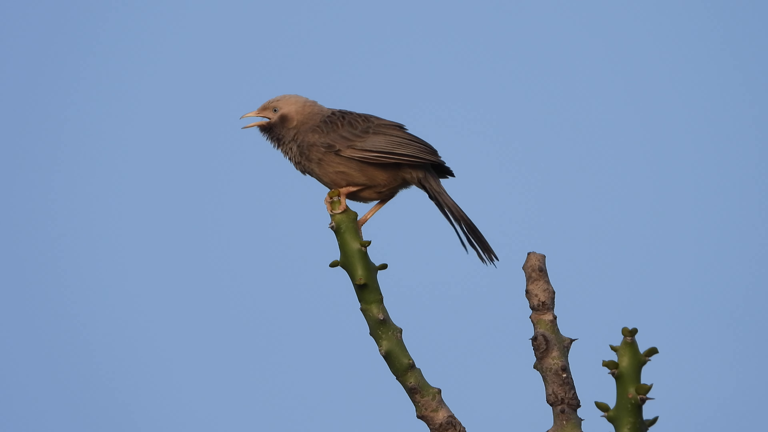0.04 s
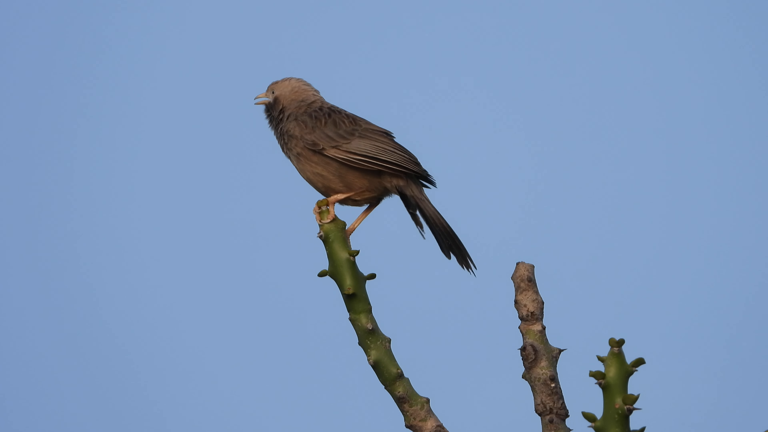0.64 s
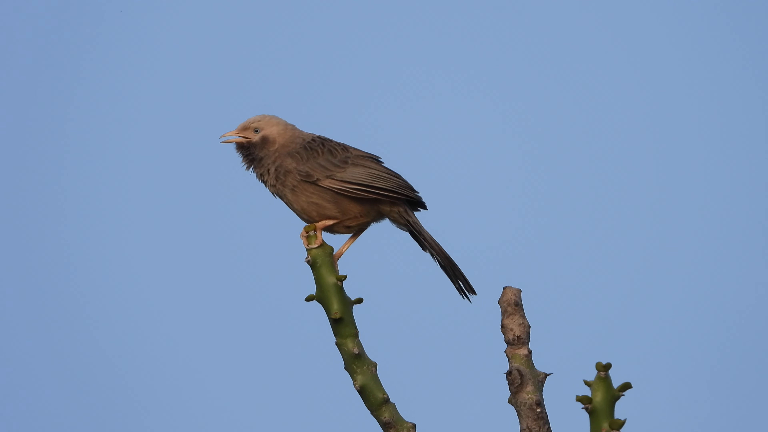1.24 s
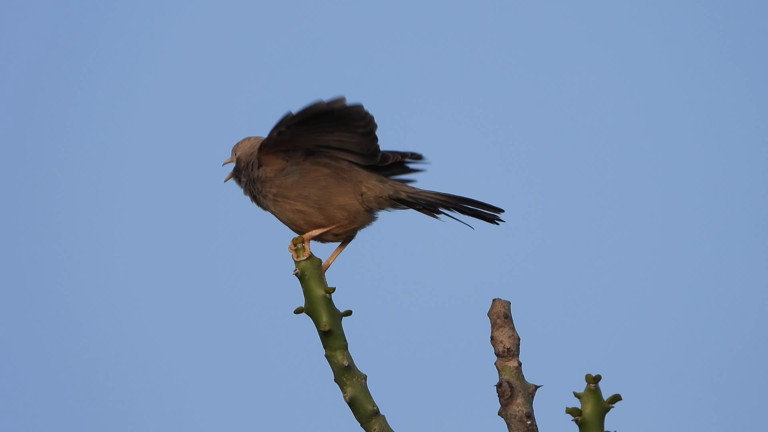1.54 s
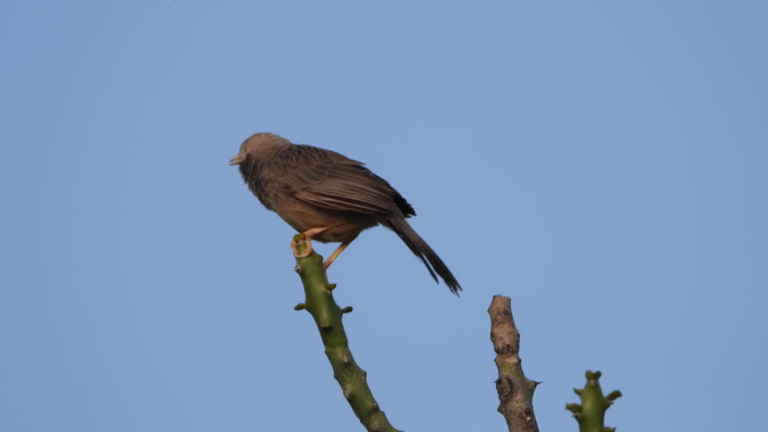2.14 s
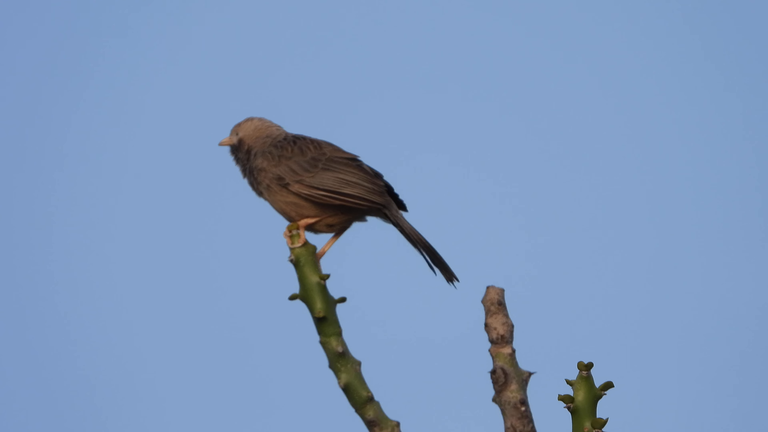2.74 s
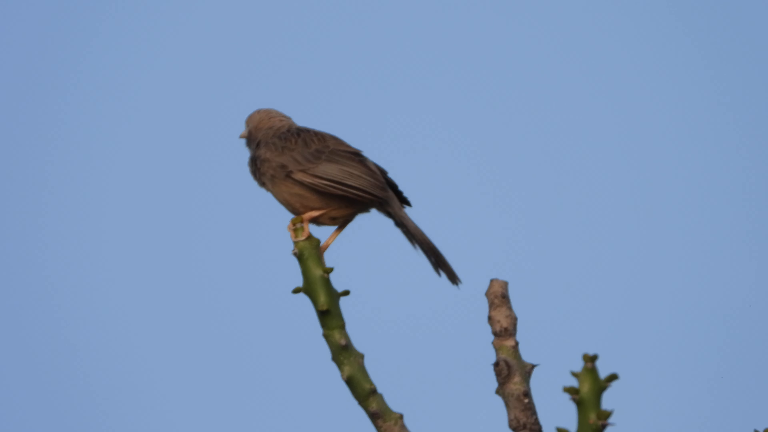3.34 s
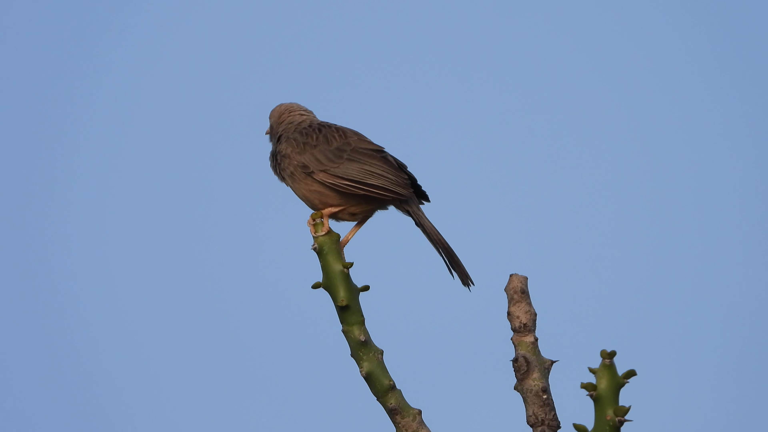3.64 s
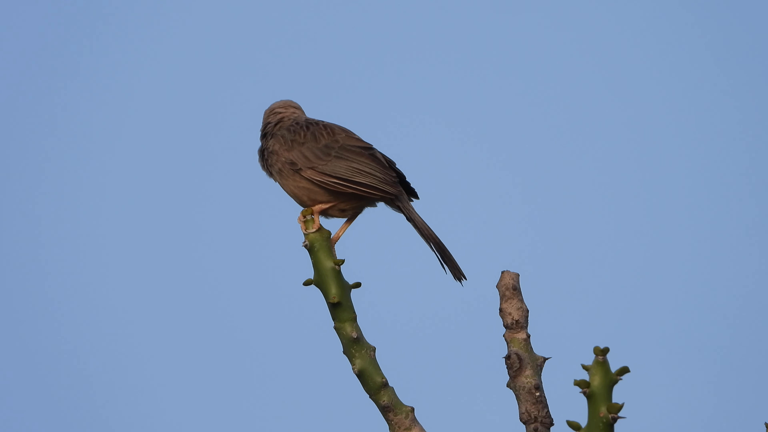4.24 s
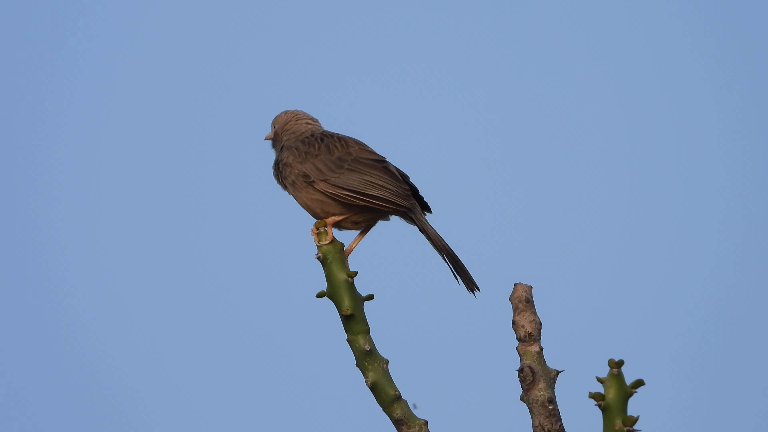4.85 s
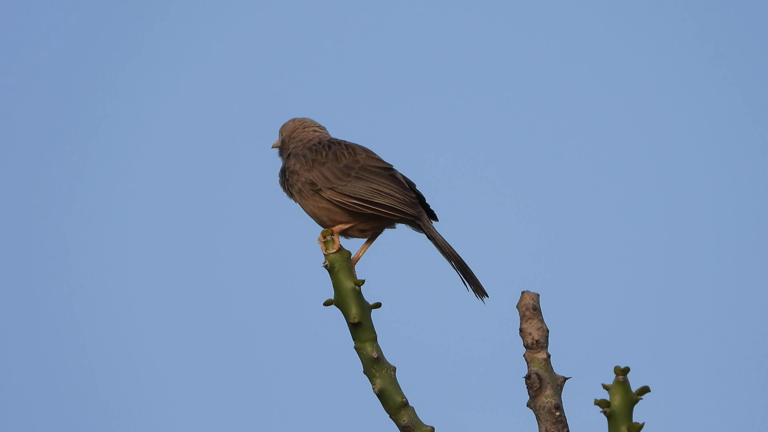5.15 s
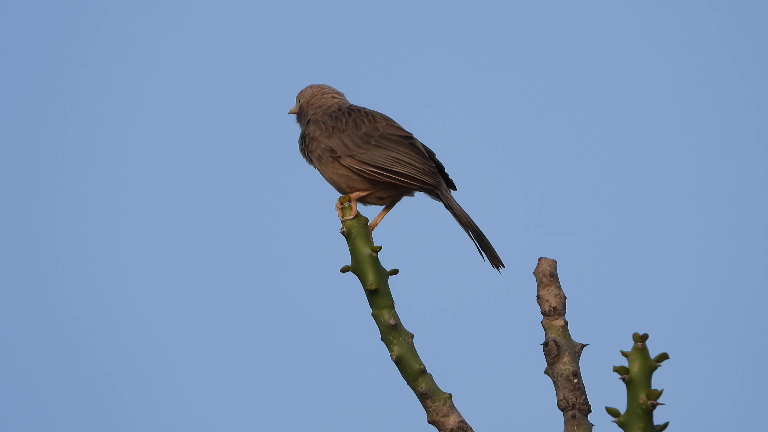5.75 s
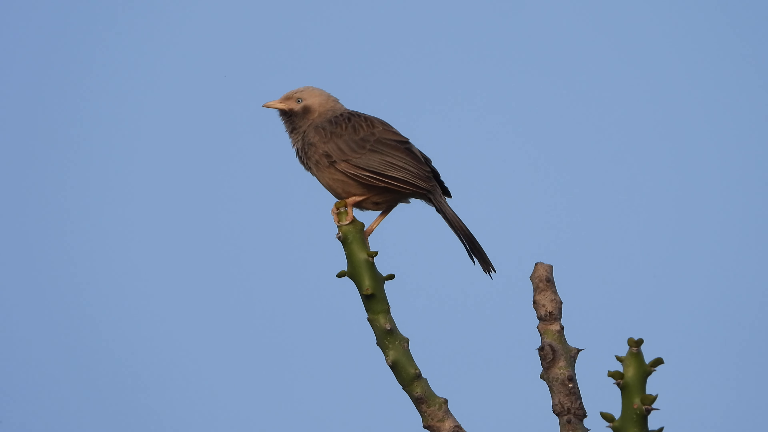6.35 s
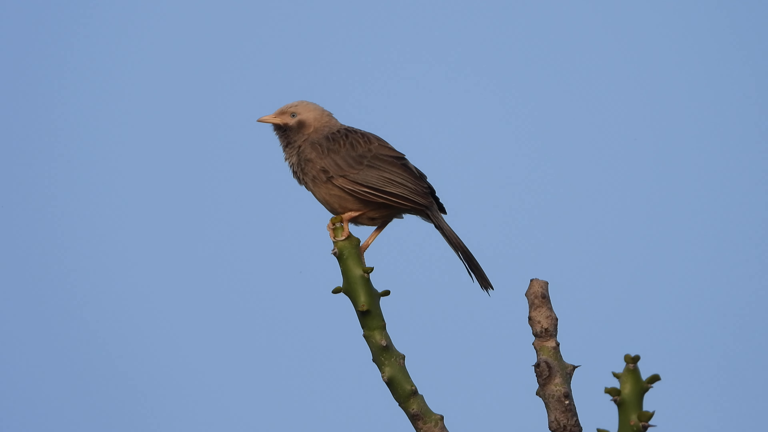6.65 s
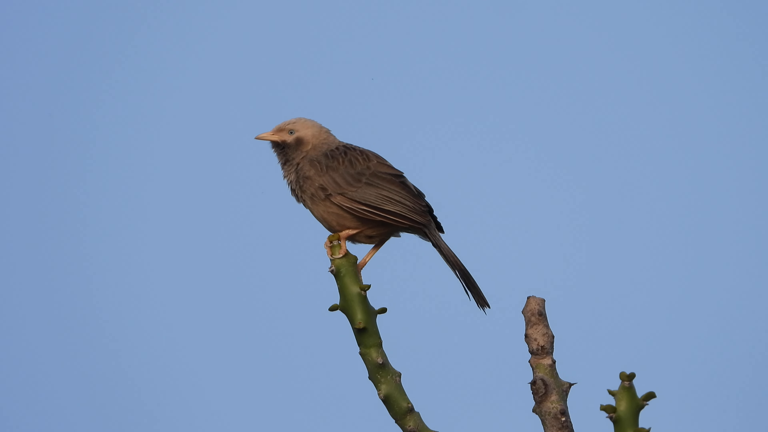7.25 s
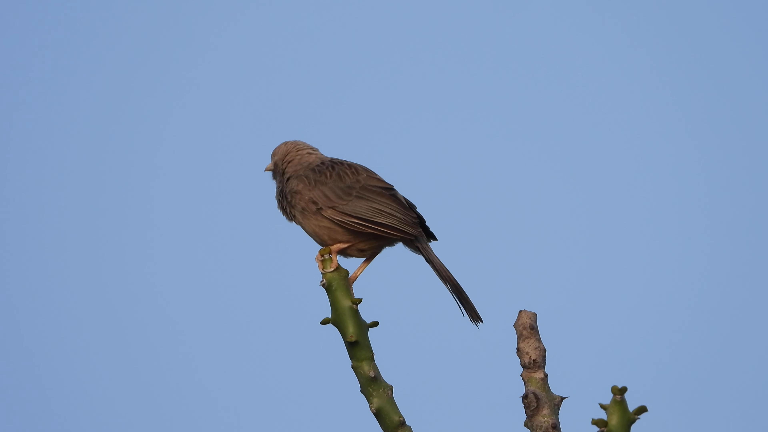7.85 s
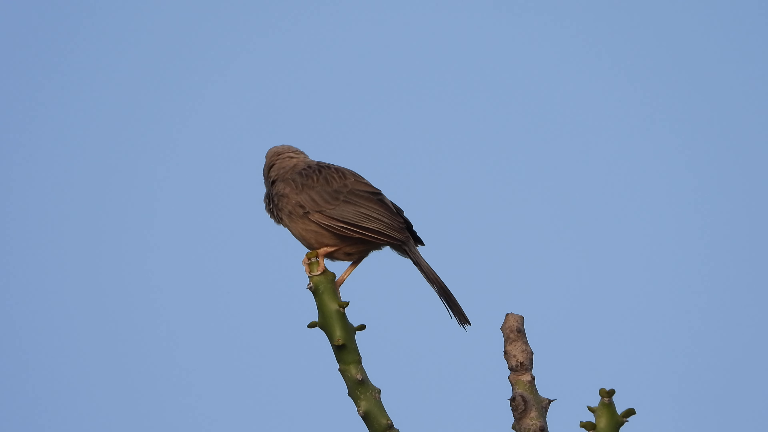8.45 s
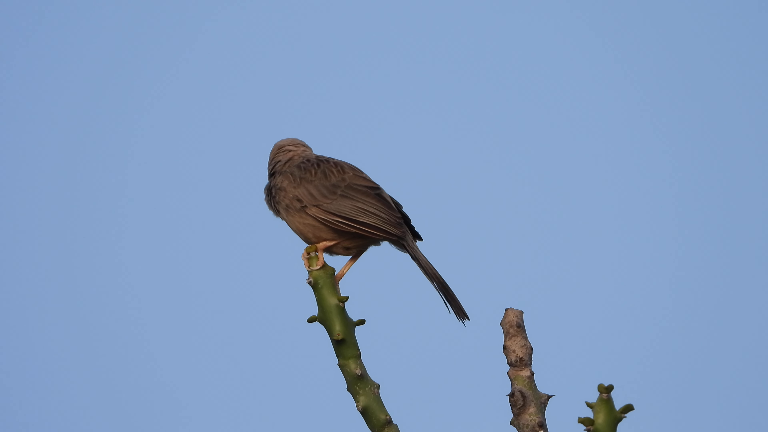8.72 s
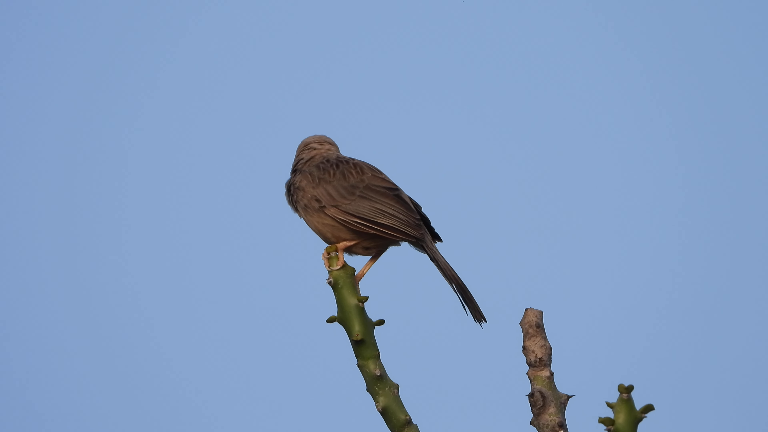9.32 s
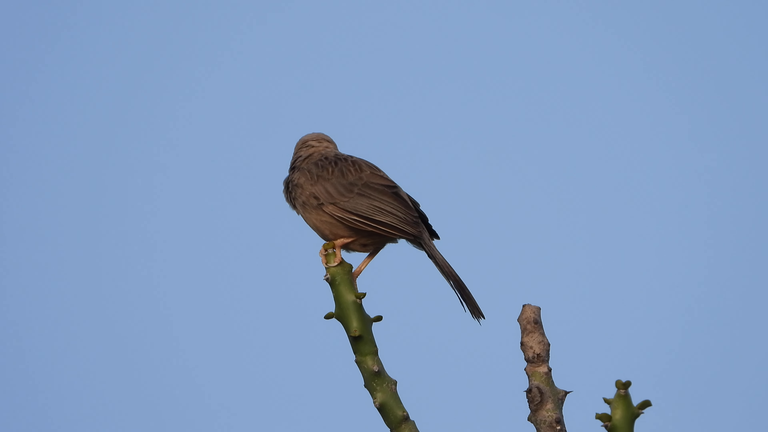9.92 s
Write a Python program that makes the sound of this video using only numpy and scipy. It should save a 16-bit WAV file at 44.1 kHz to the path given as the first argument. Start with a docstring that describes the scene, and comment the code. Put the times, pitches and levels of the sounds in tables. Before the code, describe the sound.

In quiet open scrub, a still camera right beside the microphone rattles off ten quick shutter clicks while a bird gives four rising whistles and another pips. The whistling bird then begins a long, even run of sharp falling calls. Farther birds squawk hoarsely around it, and one ends with a few soft rasps. Small birds chip throughout over a faint throbbing insect and distant traffic that slowly swells.

```python
"""In open scrub, a still camera beside the microphone fires ten quick frames while a perched babbler
whistles and a neighbour pips. From about 2 s the babbler gives a long run of sharp falling calls.
From about 4 s its flock squawks around it, and just after 8 s one bird closes with a few rasps.
All along, small birds chip and an insect throbs; far traffic slowly swells towards the end."""
import sys
import numpy as np
from scipy import signal
from scipy.fft import rfft, irfft, next_fast_len
from scipy.io import wavfile
from scipy.ndimage import uniform_filter1d

SR = 44100
rng = np.random.default_rng(int(sys.argv[2]) if len(sys.argv) > 2 else 0)


def output_pcm(signal):
    """Save a mono or channel-first signal as 16-bit PCM at the path in sys.argv[1].

    Samples are clipped to [-1, 1] before scaling.
    """
    pcm = np.clip(np.atleast_2d(signal).T, -1, 1) * 32767
    wavfile.write(sys.argv[1], SR, np.round(pcm).astype(np.int16))


N = 440118
TIME = np.arange(N) / SR
ALONG = np.linspace(0, 1, 60)   # progress through a note, 0 to 1
# the babbler's calls: (start [s], length [s], top pitch [Hz], bottom pitch [Hz], level [dB],
# low half compared with high half [dB])
FALLING_CALLS = [(1.787, 0.043, 5380, 2616, -29, -5.5), (2.05, 0.054, 5820, 2550, -22.5, -11.5),
                 (2.313, 0.056, 5520, 2664, -22, -7), (2.561, 0.053, 5580, 2610, -22.5, -5.5),
                 (2.815, 0.055, 5570, 2604, -20.5, -8), (3.066, 0.051, 5760, 2645, -24.5, -5),
                 (3.336, 0.055, 5670, 2600, -23, -7.5), (3.605, 0.058, 5480, 2604, -24.5, -5.5),
                 (3.862, 0.042, 5510, 2730, -21, -8.5), (4.11, 0.055, 5630, 2670, -23, -6.5),
                 (4.368, 0.051, 5630, 2620, -24, -6), (4.622, 0.054, 5530, 2700, -21.5, -7.5),
                 (4.877, 0.053, 5670, 2514, -20.5, -11), (5.161, 0.044, 5580, 2640, -23.5, -7),
                 (5.42, 0.047, 5740, 2596, -23.5, -10.5), (5.67, 0.046, 5700, 2640, -23, -6),
                 (6.038, 0.052, 5610, 2670, -23, -9.5), (6.406, 0.054, 5550, 2690, -24.5, -9.5),
                 (6.763, 0.05, 5620, 2560, -23.5, -9)]


def babbler(tail_s=.008, break_at=.39, break_width=.074):
    """Each call swells as it slides down, thins where the voice breaks and levels out an octave lower."""
    # shape of the fall: (progress [0 to 1], height above the bottom pitch [0 to 1])
    fall_shape = [(0, 1), (.18, .86), (.34, .62), (.47, .3), (.61, .08), (.78, 0), (1, .03)]
    height = np.interp(ALONG, *np.transpose(fall_shape))
    past_break = (ALONG - break_at) / break_width
    low_half = np.clip(1 + past_break, 0, 1)
    thinning_db = -3 * np.exp(-past_break ** 2)
    shape_db = 2 + swell(attack=.36, release=.15, depth_db=-20) + thinning_db
    facings = np.zeros((4, N))   # the bird turns its head, and each way it faces has its own echoes
    for k, (start, length, top_hz, bottom_hz, db, low_db) in enumerate(FALLING_CALLS):
        pitch = bottom_hz + (top_hz - bottom_hz) * height
        level = db + shape_db + low_db * low_half
        call = sing(length + tail_s, pitch, level, waver=.018, flutter_db=5, flutter_rate=520)
        add(facings[k % len(facings)], start, call)
    return sum(scrub(place(track, pan_db=-.8), near_db=-4.5, far_db=-13.5, near_s=.17, scatter_hz=3200)
               for track in facings)


def lilts(length=.069, after_s=.078, top_hz=2308, fade_db_per_s=-.68):
    """A soft, husky rising note follows every falling call, fainter each time."""
    out = np.zeros(N)
    pitch = top_hz * (1 - .24 * (1 - ALONG) ** 1.5)
    level = -37 + swell(attack=1, release=.4, depth_db=-18)
    for start, *_ in FALLING_CALLS:
        add(out, start + after_s, sing(length, pitch, level + fade_db_per_s * start, waver=.037))
    return scrub(place(out, pan_db=-.5), near_db=2, far_db=-7, near_s=.07)


def whistles(crest_at=.68):
    """The babbler's clean opening whistles climb to a crest and just turn over."""
    # (start [s], length [s], first pitch [Hz], top pitch [Hz], level [dB], left over right [dB])
    notes = [(0.202, 0.11, 3530, 4010, -30.5, 5), (0.626, 0.1, 3300, 4310, -25.5, 1.5),
             (1.13, 0.094, 3840, 4400, -19, 3.5), (1.682, 0.096, 3960, 4640, -18.5, 5.5)]
    out = np.zeros((2, N))
    below_crest = (1 - ALONG / crest_at) ** 2
    shape_db = swell(attack=.5, release=.36, depth_db=-19)
    for start, length, first_hz, top_hz, db, pan_db in notes:
        pitch = top_hz + (first_hz - top_hz) * below_crest
        note = sing(length, pitch, db + shape_db, waver=.0058, flutter_db=3, overtone_db=-36.5, third_db=-5)
        add(out, start, note * balance(pan_db))
    return scrub(out, near_db=-11, far_db=-24, near_s=.14)


def camera(frame_db=-28, burst_s=.214, gap_s=.1405):
    """In each frame the mirror, shutter curtains and winding set off rattles that ring in the body."""
    # knocks within one frame: (time after the release [s], level [dB], fade time [s])
    knocks = [(.001, -4.5, 0.045), (.012, -4, 0.04), (.024, -18.5, 0.035), (0.044, -1, 0.043),
              (.048, -3.5, 0.037), (.062, -13, 0.033), (.082, -6, 0.023), (0.092, -4, 0.02)]
    # tone of the rattle: (frequency [Hz], level [dB])
    rattle_tone = [(71, -42), (120, -71), (346, -21.5), (459, -22), (899, -15.5), (1590, -7), (2030, -8.5),
                   (2160, -13.5), (2440, -9), (2750, -6.5), (2980, -3.5), (3810, -3.5), (4220, 0.5),
                   (8770, -7), (15500, -31)]
    # how alike the two sides are: (frequency [Hz], likeness [-1 to 1])
    likeness = [(200, 0.8), (800, 0.6), (1500, 0.24), (4000, -0.3), (6000, 0), (9000, -0.41), (15000, 0.5)]
    # ringing of the body: (pitch [Hz], width [Hz], level [dB])
    rings = [(331, 18, 15), (548, 35, 8.5), (713, 45, 6), (1117, 17, 11), (1622, 52, 6), (1807, 28, 10.5),
             (2168, 39, 19)]
    power = np.zeros(N)
    t = np.arange(SR // 5) / SR
    for start in [-.042, *(burst_s + gap_s * np.arange(9))]:   # one frame, then nine evenly spaced
        for after_s, db, fade_s in knocks:
            strength = from_db(frame_db + db + rng.normal(0, 1))
            add(power, start + after_s, strength ** 2 * np.exp(-2 * t / fade_s))
    loudness = np.sqrt(np.abs(uniform_filter1d(power, size=40)))
    grit_times = TIME[::30]
    grit = from_db(2.7 * np.interp(TIME, grit_times, rng.standard_normal(len(grit_times))))
    rattle = stereo_noise(rattle_tone, likeness) * loudness * grit
    body = sum(from_db(db) * resonance(rattle.mean(axis=0), hz, width) for hz, width, db in rings)
    sound = from_db(1) * rattle * balance(1) + body * [[1], [.5]]
    return signal.sosfilt(signal.butter(4, 170, "high", fs=SR, output="sos"), sound)


def pips(length=.04):
    """A neighbour on the left gives runs of short, slightly arched, unsteady pips."""
    # (start [s], pitch [Hz], level [dB])
    notes = [(-0.005, 3105, -33), (0.04, 3020, -40), (0.095, 2945, -35), (0.147, 3030, -39),
             (0.332, 2960, -37.5), (0.385, 2895, -35), (0.441, 2950, -31), (0.503, 2930, -34.5),
             (0.562, 3090, -32.5), (0.879, 3060, -36), (0.932, 3010, -41), (1, 2870, -40),
             (1.065, 3020, -37.5), (1.275, 3170, -34), (1.322, 2950, -35.5), (1.375, 2920, -35),
             (1.435, 2822, -33), (1.496, 2896, -33.5), (1.559, 2940, -36.5), (1.621, 3000, -33),
             (1.936, 3100, -37.5), (1.993, 2950, -36.5), (2.121, 2880, -36.5), (2.224, 2790, -41.5),
             (2.285, 2820, -42.5), (2.459, 3265, -39.5), (2.518, 3000, -38), (2.675, 2950, -38.5),
             (2.753, 2890, -39), (3.271, 2910, -40)]
    out = np.zeros(N)
    shape_db = 3.5 + swell(attack=.4, release=.72, depth_db=-16)
    arch = 1 + .02 * (.25 - (2 * ALONG - 1) ** 2)
    for start, hz, db in notes:
        add(out, start, sing(length, hz * arch, db + shape_db, waver=.018))
    return scrub(place(out, pan_db=4), near_db=-11, far_db=-18)


def chips():
    """Small birds give thin chips from the right."""
    # (start [s], length [s], top pitch [Hz], level [dB])
    notes = [(.574, 0.032, 5920, -29), (.796, .025, 6070, -23), (.815, 0.026, 6110, -24.5),
             (.84, 0.019, 5640, -26), (1.745, 0.029, 6840, -37.5), (2.019, 0.024, 5900, -40.5),
             (2.09, 0.024, 6180, -27.5), (2.114, 0.029, 5980, -27), (2.709, 0.026, 5550, -36),
             (3.311, 0.016, 6100, -31.5), (3.569, 0.023, 6070, -23.5), (3.827, 0.023, 6280, -30.5),
             (4.028, 0.025, 6550, -34), (5.301, 0.021, 6560, -29.5), (5.416, 0.026, 5980, -22),
             (5.463, 0.031, 5770, -25.5), (5.768, 0.02, 6200, -38), (6.56, 0.024, 6800, -36),
             (6.615, 0.027, 5500, -40), (7.759, .021, 6280, -38), (7.892, 0.02, 7230, -34),
             (7.935, 0.029, 6180, -30), (8.148, .029, 6500, -32), (8.2, .029, 5900, -31.5),
             (8.241, .031, 5540, -34.5), (8.456, 0.019, 6800, -38), (9.325, .021, 5820, -34),
             (9.362, 0.028, 6530, -29), (9.684, .02, 6000, -40), (9.807, 0.03, 5870, -33),
             (9.849, 0.025, 5550, -30.5), (9.877, 0.019, 6800, -40), (9.949, 0.028, 6900, -33.5)]
    return scrub(place(chip_series(notes), pan_db=-1.5, lag_s=-3.9e-5), near_db=-6, far_db=-13)


def slurs():
    """Clean notes from other perches, each bending smoothly through three pitches."""
    # (start [s], length [s], first pitch [Hz], middle pitch [Hz], last pitch [Hz], level [dB],
    # left over right [dB])
    notes = [(0.779, 0.073, 4500, 4350, 4250, -29.5, -2), (1.84, 0.087, 3340, 3294, 3090, -36, 4),
             (3.405, 0.16, 4710, 3720, 3010, -36.5, -3), (3.425, 0.04, 2425, 2515, 2460, -32.5, 1),
             (3.767, 0.16, 2895, 2340, 2660, -37.5, -3), (6.166, 0.041, 2903, 3060, 2954, -28.5, 3.5),
             (7.017, 0.07, 2926, 3168, 3080, -31.5, 7.5), (7.272, 0.055, 2710, 3140, 3770, -44, -5),
             (7.304, 0.35, 3540, 3500, 3310, -40, -5), (9.835, 0.027, 3380, 2980, 3120, -46, 0)]
    out = np.zeros((2, N))
    shape_db = swell(attack=.048, release=.51, depth_db=1.5)
    for start, length, *pitches, db, pan_db in notes:
        pitch = np.polyval(np.polyfit([0, .5, 1], pitches, 2), ALONG)
        add(out, start, sing(length, pitch, db + shape_db) * balance(pan_db))
    return scrub(out, near_db=-3, far_db=-9, near_s=.11)


def flock(soft_count=14, from_s=4.4, until_s=8.0):
    """Farther birds squawk, with soft squawks at random in between while they are most excited."""
    # (start [s], length [s], first pitch [Hz], last pitch [Hz], level [dB], shake [share of the pitch])
    squawks = [(4.27, 0.059, 1684, 1556, -52.5, 0.049), (4.477, .04, 1400, 1600, -48.5, 0.12),
               (4.745, 0.048, 2140, 1857, -42, 0.064), (4.79, 0.023, 1780, 1300, -40.5, 0.12),
               (4.975, 0.073, 1392, 1660, -43.5, 0.099), (5.132, 0.029, 1540, 1320, -42, 0.074),
               (5.212, 0.036, 2365, 2025, -35, 0.072), (5.388, 0.077, 1353, 1356, -42.5, 0.12),
               (5.397, 0.058, 2870, 2920, -41.5, 0.046), (5.633, 0.027, 1317, 1450, -38.5, 0.034),
               (5.664, 0.034, 1766, 2600, -37, 0.049), (5.719, 0.025, 1464, 1530, -42.5, 0.1),
               (6.294, 0.032, 2880, 2224, -37, 0.13), (6.403, 0.041, 2947, 3103, -31, 0.02),
               (6.547, 0.031, 2520, 1890, -33.5, 0.033), (6.591, 0.038, 1504, 1340, -44.5, 0.058),
               (6.631, 0.04, 2150, 1950, -43, 0.048), (6.818, 0.022, 1370, 1520, -42.5, .08),
               (6.843, 0.029, 2020, 2795, -34, 0.052), (6.859, 0.025, 3100, 2634, -35, 0.019),
               (7.012, 0.0213, 2320, 2810, -41, 0.14), (7.062, 0.023, 3130, 2480, -38, 0.055),
               (7.13, 0.019, 1570, 1360, -42.5, 0.18), (7.151, 0.017, 2010, 2110, -41, .04),
               (7.218, .06, 1307, 1700, -50, 0.075), (7.413, 0.045, 1480, 1396, -41.5, 0.11),
               (7.654, 0.044, 1243, 1800, -48.5, 0.078), (7.74, 0.087, 2810, 2276, -41.5, 0.094),
               (7.812, 0.032, 1658, 1290, -46, 0.1), (8.054, 0.045, 1920, 2404, -40, 0.2)]
    out = np.zeros(N)
    for start, *call in squawks:
        add(out, start, squawk(*call))
    for k, (when, *ends) in enumerate(rng.random((soft_count, 3))):
        start = from_s + (until_s - from_s) * (k + when) / soft_count
        first_hz, last_hz = np.interp(ends, [0, 1], [1380, 2670])
        add(out, start, squawk(.037, first_hz, last_hz, db=-45.5))
    return scrub(place(out, pan_db=-1, lag_s=1.5e-5), near_db=1, far_db=-4.5, near_s=.25)


def rasps(length=.036, first_hz=3740, rise=.0567):
    """One bird closes with a series of higher, slightly rising rasps."""
    # (start [s], level [dB])
    notes = [(8.212, -43), (8.32, -43.5), (8.402, -42), (8.502, -43.5), (8.603, -47)]
    out = np.zeros(N)
    for start, db in notes:
        add(out, start, squawk(length, first_hz, first_hz * (1 + rise), db, shake=.095, shake_rate=1500))
    return scrub(place(out, pan_db=-1), near_db=-1, far_db=-7, near_s=.28)


def far_chips(count=34, db=-53, until_s=8.0):
    """Birds deep in the scrub chip faintly at random moments until the flock calms down."""
    notes = [(when * until_s, .025, 5000 + 2000 * height, db + 3 * rng.normal())
             for when, height in rng.random((count, 2))]
    return scrub(place(chip_series(notes), pan_db=0), near_db=-3, far_db=-8)


def ticks(fade_s=.012):
    """Small dry ticks close by, each a bright snap of noise."""
    # (time [s], level before filtering [dB])
    snaps = [(2.3386, -47), (6.412, -46), (9.826, -39), (9.9044, -45)]
    out = np.zeros((2, N))
    t = np.arange(SR // 20) / SR
    for start, db in snaps:
        add(out, start, from_db(db) * np.exp(-t / fade_s) * rng.standard_normal((2, len(t))))
    return signal.sosfilt(signal.butter(2, [4000, 10500], "band", fs=SR, output="sos"), out)


def insect(hz=6550, width=180, db=-64, throb_hz=5.9, crest_s=8.8):
    """A faint, narrow buzz throbs about six times a second."""
    buzz = narrow_noise((2, N), hz, width)
    throb = np.clip(.77 + np.cos(2 * np.pi * throb_hz * (TIME - crest_s)), 0, 1)
    return from_db(db) * throb * buzz / buzz.std()


def far_tones(width_hz=32):
    """Held tones from far off, blurred into narrow bands, swell and fade."""
    # (start [s], length [s], pitch [Hz], level [dB])
    tones = [(1.55, .5, 1360, -63), (4.85, .33, 915, -55), (8.8, 1.4, 892, -60), (8.8, 1.4, 1357, -62)]
    out = np.zeros(N)
    for start, length, hz, db in tones:
        tone = narrow_noise(2 * SR, hz, width_hz)[-int(length * SR):]
        fade = signal.windows.tukey(len(tone), .5)
        add(out, start, from_db(db) * fade * tone / tone.std())
    return out


def murmur(count=22, width_share=.082):
    """Far, blurred sounds come and go: each band of noise swells and sinks from its own direction."""
    # tone of the murmur: (frequency [Hz], band level [dB])
    tone = [(300, -84), (370, -77.5), (450, -71.5), (560, -81.5), (720, -68), (900, -68), (1100, -70.5),
            (1400, -70), (1900, -74), (3000, -77)]
    # its slow rise: (time [s], level change [dB])
    rise = [(2.5, -0.5), (5, 0.5), (8.3, 1), (9.3, 4)]
    out = 0
    for hz in np.geomspace(tone[0][0], tone[-1][0], count):
        band = narrow_noise(N, hz, width_share * hz)
        drift_db = 5.5 * np.clip(wander(N, 14), -2, 1.7)
        band = band / band.std() * from_db(np.interp(hz, *np.transpose(tone)) + drift_db)
        out = out + place(band, pan_db=rng.normal(0, 1.5), lag_s=rng.normal(0, 6e-5))
    return out * from_db(np.interp(TIME, *np.transpose(rise)))


def air_and_traffic():
    """Still air with a soft hiss, a far motor's hum and a road whose rush slowly gets louder."""
    # tone of each noise: (frequency [Hz], level [dB])
    air_tone = [(15, -98), (25, -40), (182, 4), (294, -8), (441, -15.5), (612, -17), (743, -13.5),
                (2500, -6.5), (3250, -38), (5500, -120)]
    hiss_tone = [(2500, -5.5), (3800, -5), (5300, -4), (6500, -6), (7900, -13), (9200, -11), (11000, -23),
                 (13000, -25), (15500, -61)]
    motor_tone = [(90, -34), (158, -13.5), (183, 8), (208, 2), (260, -61)]
    road_tone = [(250, -8.5), (370, -12.5), (440, 10), (560, -22.5), (720, 12), (900, 9.5), (1220, 3),
                 (1400, 8.5), (1700, 2.5), (3000, -49)]
    # how alike the two sides are: (frequency [Hz], likeness [-1 to 1])
    likeness = [(40, 0.85), (150, 0.88), (1000, 0.73), (3000, 0.33), (6000, 0.024), (14000, 0.069)]
    # swell of the road: (time [s], level [dB])
    road_swell = [(2.5, -70), (4.5, -58), (7.5, -57), (9.3, -53.5)]
    air = from_db(-63) * stereo_noise(air_tone, likeness)
    hiss = from_db(-55.5) * stereo_noise(hiss_tone, likeness)
    motor = from_db(-68) * stereo_noise(motor_tone, likeness)
    road_db = np.interp(TIME, *np.transpose(road_swell)) + 2 * wander(N, 8.7)
    return air + hiss + motor + from_db(road_db) * stereo_noise(road_tone, likeness)


def sing(length, hz, db, waver=.007, waver_rate=400, flutter_db=4, flutter_rate=282,
         overtone_db=-40, third_db=-30):
    """One bird note with two weak overtones; its pitch wavers and its level flutters at random."""
    t = np.arange(0, length, 1 / SR)
    hz, db = [np.interp(t / length, ALONG, curve) for curve in (hz, db)]
    phase = 2 * np.pi * np.cumsum(hz * (1 + waver * wander(len(t), waver_rate))) / SR
    edges = np.clip(np.minimum(t, length - t) / .002, 0, 1)   # quick fades prevent clicks
    overtones = np.sin(2 * phase) + from_db(third_db) * np.sin(3 * phase)
    level = db + flutter_db * np.minimum(wander(len(t), flutter_rate), 1)
    return edges * from_db(level) * (np.sin(phase) + from_db(overtone_db) * overtones)


def chip_series(notes, crest_at=.401, rise=.261, drop=.401):
    """Each chip flicks up to its top pitch, then grows louder as the pitch drops away."""
    out = np.zeros(N)
    before = np.maximum(1 - ALONG / crest_at, 0)
    after = np.maximum(ALONG - crest_at, 0) / (1 - crest_at)
    arch = 1 - rise * before ** 2 - drop * after ** 2
    shape_db = 11.5 * (ALONG - .72) + swell(attack=.11, release=.2, depth_db=-17.5)
    for start, length, hz, db in notes:
        add(out, start, sing(length, hz * arch, db + shape_db, waver=.026, waver_rate=1200))
    return out


def squawk(length, first_hz, last_hz, db, shake=.09, shake_rate=400):
    """A straight glide; the more its pitch shakes, the hoarser it is."""
    pitch = first_hz + (last_hz - first_hz) * ALONG
    level = db + swell(attack=.35, release=.2, depth_db=-10)
    return sing(length, pitch, level, waver=shake, waver_rate=shake_rate, flutter_db=4.5)


def swell(attack, release, depth_db):
    """A note's level in dB, near depth_db at both ends; attack and release are shares of its length."""
    opening = np.maximum(1 - ALONG / attack, 0)
    closing = np.maximum(1 - (1 - ALONG) / release, 0)
    return depth_db * (opening ** 2 + closing ** 2)


def scrub(x, near_db, far_db, near_s=.18, far_s=.53, alike=.64, scatter_hz=None):
    """Ground and near bushes return a quick cluster of echoes, farther trees a faint long one."""
    t = np.arange(SR * 2 // 3) / SR
    response = 0
    for db, fade_s, first_s in ((near_db, near_s, .003), (far_db, far_s, .02)):
        shared, *sides = rng.standard_normal((3, len(t))) * (rng.random((3, len(t))) < .015)
        echoes = np.sqrt(alike) * shared + np.sqrt(1 - alike) * np.array(sides)
        echoes = echoes * from_db(-60 * t / fade_s) * (t > first_s)
        response = response + from_db(db) * echoes / np.sqrt(np.sum(echoes ** 2) / 2)
    if scatter_hz:   # thin twigs return little below this pitch
        response = signal.sosfilt(signal.butter(2, scatter_hz, "high", fs=SR, output="sos"), response)
    return x + signal.fftconvolve(x, response, axes=1)[:, :N]


def stereo_noise(tone, likeness):
    """Noise of strength 1 with a given tone and likeness between left and right."""
    size = next_fast_len(N)
    log_hz = np.log(np.arange(size // 2 + 1) * SR / size + 1)
    db, alike = [np.interp(log_hz, np.log(hz), values)
                 for hz, values in (np.transpose(tone), np.transpose(likeness))]
    outside = np.maximum(np.log(tone[0][0]) - log_hz, 0) + np.maximum(log_hz - np.log(tone[-1][0]), 0)
    mid, side = rfft(rng.standard_normal((2, size))) * from_db(db - 40 * outside)
    noise = irfft(np.sqrt(1 + alike) * mid + np.sqrt(1 - alike) * side * [[1], [-1]], size)[:, :N]
    return noise / noise.std()


def narrow_noise(shape, hz, width):
    """Noise squeezed into a narrow band around one pitch."""
    return resonance(resonance(rng.standard_normal(shape), hz, width), hz, width)


def resonance(x, hz, width):
    """Ring at one pitch, letting through a band that is width Hz wide."""
    r = np.exp(-np.pi * width / SR)
    feedback = [1, -2 * r * np.cos(2 * np.pi * hz / SR), r * r]
    return signal.lfilter(np.array([1, 0, -1]) * (1 - r * r) / 2, feedback, x)


def wander(size, rate):
    """A random drift, mostly within -1 to 1, that turns rate times a second."""
    return np.interp(np.arange(size) * rate / SR, np.arange(4000), rng.standard_normal(4000))


def place(x, pan_db, lag_s=0):
    """Give a sound a direction: one side is louder, and the right side is delayed by lag_s."""
    return np.array([x, np.interp(TIME - lag_s, TIME, x)]) * balance(pan_db)


def balance(pan_db):
    """Left and right gains; above 0 dB the left is louder."""
    return from_db([[pan_db / 2], [-pan_db / 2]])


def add(track, start_s, sound):
    """Mix a sound into a track; what falls outside is dropped."""
    at = int(round(start_s * SR))
    first, last = max(at, 0), min(at + sound.shape[-1], N)
    track[..., first:last] += sound[..., first - at:last - at]


def from_db(db):
    """Turn decibels into a gain to multiply by."""
    return 10 ** (np.asarray(db) / 20)


def scene():
    """All sources together at the microphone."""
    birds = babbler() + lilts() + whistles() + slurs() + pips() + chips() + far_chips() + flock() + rasps()
    return birds + camera() + ticks() + insect() + murmur() + far_tones() + air_and_traffic()


def record(dry):
    """The highest treble, above 15730 Hz, is cut steeply."""
    return signal.sosfilt(signal.ellip(12, .1, 90, 15730, fs=SR, output="sos"), dry)


dry = scene()
out = record(dry)
output_pcm(out)
```